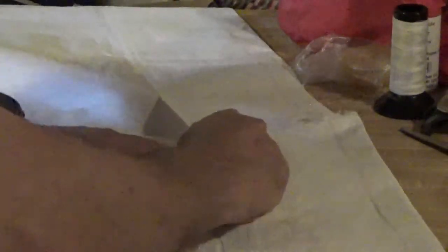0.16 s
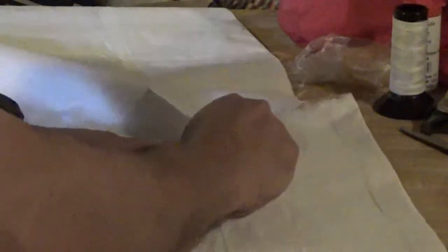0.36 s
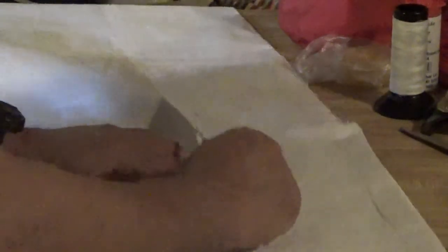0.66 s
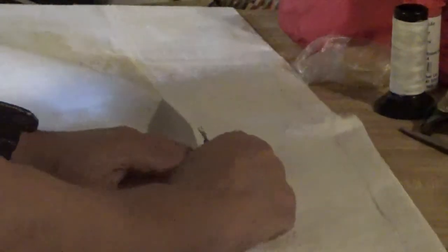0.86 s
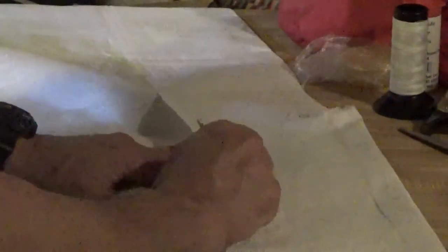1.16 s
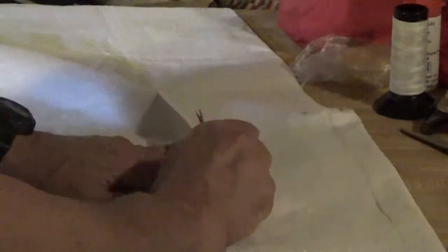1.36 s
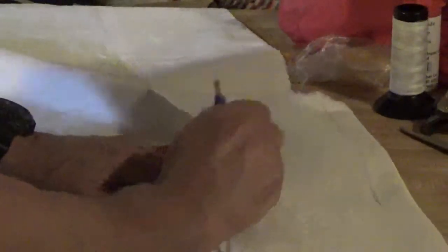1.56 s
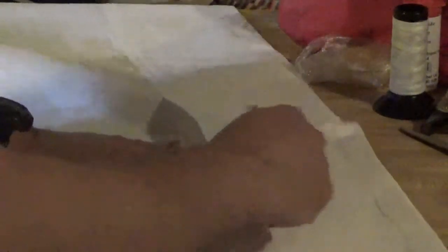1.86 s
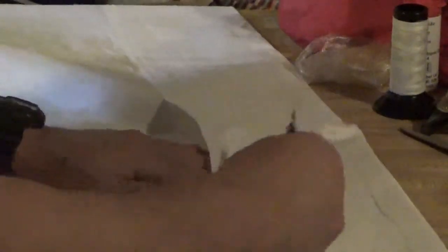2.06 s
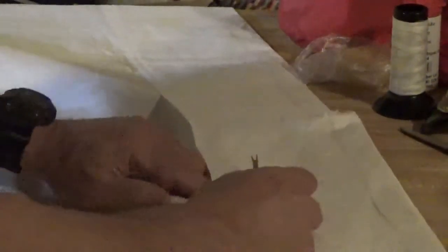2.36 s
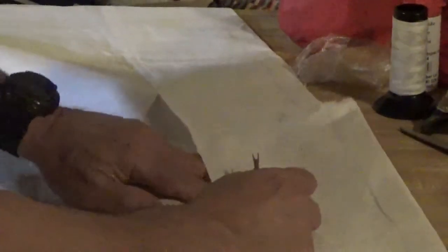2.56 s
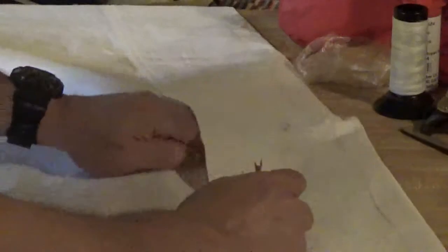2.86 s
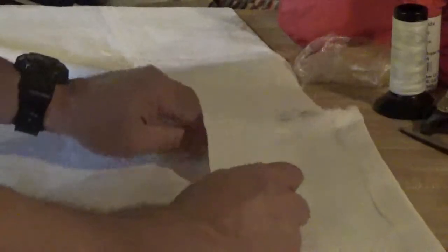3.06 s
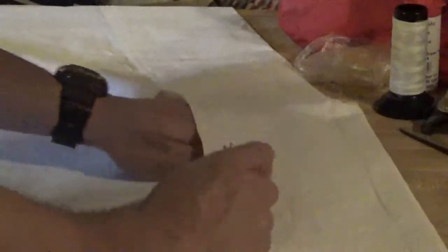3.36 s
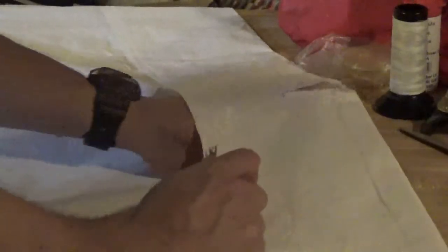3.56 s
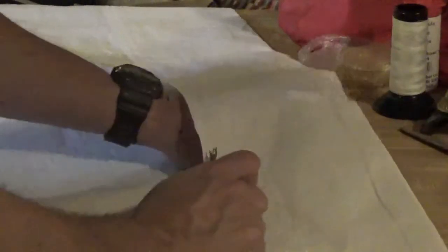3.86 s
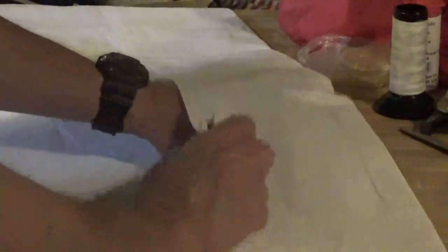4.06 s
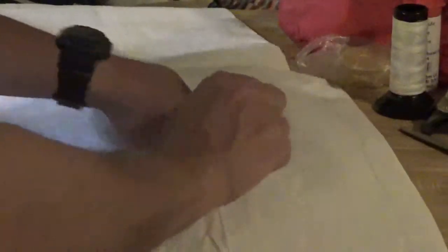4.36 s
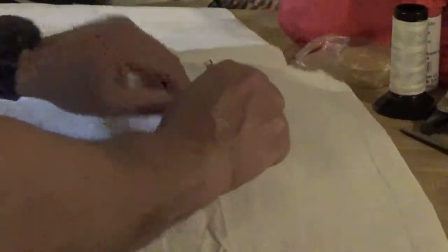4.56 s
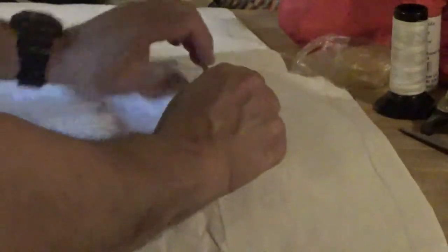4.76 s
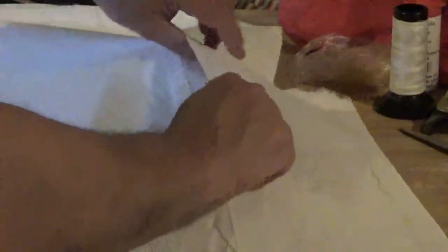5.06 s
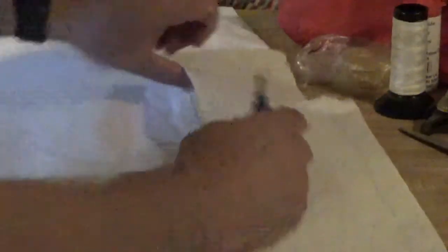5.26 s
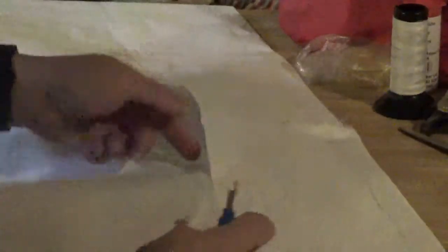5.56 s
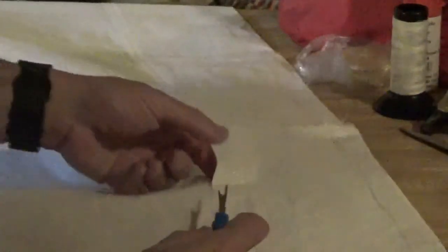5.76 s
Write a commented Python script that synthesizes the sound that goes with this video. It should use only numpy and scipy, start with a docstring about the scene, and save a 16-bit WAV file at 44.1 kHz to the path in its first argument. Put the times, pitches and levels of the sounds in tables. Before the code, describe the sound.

Close, dry rustling of heavy sailcloth being handled, broken by a sharp ripping snap, a soft hand touch and scattered crisp pops.

```python
"""Picking apart a sailcloth seam

Stiff sailcloth is worked with a seam ripper on a wooden table, close to a camera microphone in a small room.
Random grains, coloured by band, make the weave hiss, the panels crumple and the creases crackle.
Short damped swings make the pops of creases flipping over and the loud, short rip of stitches parting.
The rip and a hand coming down softly after it excite decaying cosines, the modes of the table."""
import sys
import numpy as np
from scipy import signal
from scipy.fft import rfft, irfft
from scipy.io import wavfile
from scipy.ndimage import map_coordinates

SR = 44100
rng = np.random.default_rng(int(sys.argv[2]) if len(sys.argv) > 2 else 0)


def store_pcm(level_fs):
    """Save levels as 16-bit WAV."""
    pcm = np.round(np.clip(level_fs, -1, 1) * 32767).astype(np.int16)
    wavfile.write(sys.argv[1], SR, np.atleast_2d(pcm).T)


N = 261072
TIME = np.arange(N) / SR
PRE_S = 1 / 1000  # a crack's waveform begins this long before its centre


def undb(db):
    """Decibels to amplitude ratio."""
    return 10 ** (np.asarray(db) / 20)


def unit(x):
    """Scale to an RMS of 1."""
    return x / np.sqrt(np.mean(x ** 2))


def add(track, s, sound):
    """Mix a sound in from time s, or from the start if s is negative."""
    i = max(int(s * SR), 0)
    track[i:i + len(sound)] += sound[:len(track) - i]


def colour(x, points, size=2048):
    """Minimum-phase filter that follows a (Hz, dB) spectrum, built by folding its cepstrum."""
    hz, db = np.transpose(points)
    log_hz = np.log(np.fft.rfftfreq(size, 1 / SR) + 1)
    log_gain = np.log(undb(np.interp(log_hz, np.log(hz), db)))
    cepstrum = irfft(log_gain)[:size // 2]
    cepstrum[1:] *= 2
    response = irfft(np.exp(rfft(cepstrum, size)))
    return signal.fftconvolve(x, response)[:len(x)]


def band(x, hz, q):
    """One resonance; a low q makes it broad."""
    return signal.lfilter(*signal.iirpeak(min(hz, SR / 4), max(q, .5), fs=SR), x)


def fade(t, t60):
    """Exponential decay that falls 60 dB in t60 seconds."""
    return np.exp(-np.log(1000) * t / t60)


def walk(rate):
    """Random wander: straight lines between normal draws, rate draws per second."""
    steps = rng.standard_normal(N // 20)
    return np.interp(TIME * rate, np.arange(len(steps)), steps)


def grains(rate, spread_db):
    """Tiny slips at random moments, rate per second; a wider spread makes a few much larger."""
    sizes = undb(spread_db * np.minimum(rng.exponential(size=N), 4))
    happens = rng.random(N) < rate / SR
    return unit(happens * rng.choice([-1, 1], N) * sizes)


def room_tone():
    """Steady air of the small room: noise coloured to a fixed spectrum."""
    # spectrum of the air: f/Hz, relative level/dB
    tone_spectrum = [(25, -29), (60, -13.5), (120, -11), (280, 2), (500, -2), (1500, -11), (4000, -8.5),
                     (11000, -17.5)]
    return undb(-68.5) * unit(colour(rng.standard_normal(N), tone_spectrum))


def room(x, t60, treble_t60):
    """Dense reflections from the table and near walls; the treble dies first."""
    t = TIME[:SR // 2]
    noise = rng.standard_normal(len(t))
    low = signal.sosfilt(signal.butter(1, 2500, fs=SR, output="sos"), noise)
    tail = low * fade(t, t60) + (noise - low) * fade(t, treble_t60)
    tail = tail * np.minimum(t / 0.0024, 1)  # the reflections build up over 2.4 ms
    return signal.fftconvolve(x, tail / np.sqrt(np.sum(tail ** 2)))[:N]


def table(push):
    """The table top under the taut cloth rings in its modes."""
    # modes of the wood: f/Hz, level/dB, t60/s
    table_modes = [(99, -24.5, 0.34), (142, -15, 0.18), (232.4, -14, 0.23), (302, -14.5, 0.097),
                   (426, -13.5, 0.097), (515, -18, 0.16), (561, -8, 0.057), (696, -31, 0.19),
                   (900, -4, 0.053), (1087, 2.5, 0.052), (1181, -3, 0.077), (1289, -48, .08),
                   (1697, -9, .09), (1930, -30, 0.046), (2920, -21, 0.095)]
    t = TIME[:SR // 2]
    ring = sum(undb(db) * fade(t, t60) * np.cos(2 * np.pi * hz * t) for hz, db, t60 in table_modes)
    return signal.fftconvolve(push, ring)[:N]


def hand(low_hz, soft_hz, gain_db):
    """Soft flesh, set down lightly, wakes mainly the table's low-middle modes."""
    # touches as the hand settles: t/s, relative level/dB
    presses = [(2.2141, -32.5), (2.2219, -38), (2.2245, -33.5)]
    push = np.zeros(N)
    for s, db in presses:
        add(push, s, undb([db + gain_db]))
    soft_band = signal.butter(2, [low_hz, soft_hz], "bandpass", fs=SR, output="sos")
    return table(signal.sosfilt(soft_band, push))


def handling():
    """Levels in dB of bending, creasing and sliding: each stroke starts, swells or eases, and dies away."""
    # pushes and pulls of the cloth: start t/s, length/s, effort level/dB, swell over the stroke/dB,
    # hiss against effort/dB, bending against effort/dB
    strokes = [(-0.02, 0.16, -60.5, -11, -2.5, -22), (0.174, 0.061, -52, -0.5, -3.5, -21),
               (0.248, 0.043, -46, 3, 1, -5), (0.587, 0.046, -48, 2.5, -3, -8.5),
               (0.65, 0.053, -52.5, -4, -2.5, -0.5), (0.782, 0.29, -60, -12, -4.5, -20),
               (1.092, 0.13, -60.5, 3, -4, -3.5), (1.371, 0.02, -51, -1.5, -5, -6),
               (1.513, 0.17, -59, 0.5, -0.5, 1), (1.701, 0.15, -51.5, 0.5, -2.5, -6),
               (1.87, 0.026, -55.5, 1.5, -0.5, -3), (2.02, 0.14, -62, 6.5, -4.5, -8),
               (2.176, 0.033, -49.5, 2, -5.5, 0.5), (2.232, 0.065, -53, -1, -5.5, -12),
               (2.526, 0.2, -57.5, 6.5, -1.5, -6.5), (2.713, 0.032, -47.5, 0, -2.5, -12),
               (2.778, 0.11, -51, 5.5, 1.5, -15.5), (2.965, 0.14, -56, 1, -1, -6.5),
               (3.084, 0.092, -53, 6, 2.5, -7), (3.249, 0.53, -50, 3.5, 1, -10),
               (3.876, 0.063, -52.5, 10, -3, -7), (3.955, 0.39, -53.5, 2.5, -3, -6.5),
               (4.26, 0.34, -50.5, 3.5, 0.5, -3), (4.756, 0.039, -51.5, 7, 0.5, -4),
               (4.809, 0.11, -52, -1.5, -3, 0.5), (4.93, 0.12, -54.5, 4, 0.5, 1.5),
               (5.109, 0.13, -53, -5, 0.5, 0.5), (5.249, 0.3, -57.5, -6, 0, -5.5),
               (5.621, 0.16, -58.5, 2.5, 0, -0.5), (5.855, 0.053, -56.5, -4, -2.5, -3)]
    # cloth merely held: bending level/dB, creasing level/dB, sliding level/dB
    resting_db = (-68.5, -65.5, -67)
    attack_s, attack_share = 0.024, 0.088  # plus a share of the length: long pulls start gently
    release_db_per_s = 202  # every stroke comes to rest alike
    power = np.outer(undb(resting_db) ** 2, np.ones(N))
    for s, length, effort_db, swell_db, hiss_db, bend_db in strokes:
        t = TIME[:int(length * SR) + SR // 2]
        swell = swell_db * (np.minimum(t / length, 1) - .5)
        release = release_db_per_s * np.maximum(t - length, 0)
        attack = np.minimum(t / (attack_s + attack_share * length), 1)
        stroke = attack * undb(effort_db + swell - release)
        for layer, share_db in zip(power, (bend_db, 0, hiss_db)):
            add(layer, s, (stroke * undb(share_db)) ** 2)
    return 10 * np.log10(power)


def rub(x, drift_db, rate):
    """The patch in contact keeps changing, so the colour of the rubbing shifts band by band."""
    out = 0
    for hz in np.geomspace(600, 10000, 8):
        out = out + band(x, hz, q=6.9) * (undb(drift_db * walk(rate)) - 1)
    return x + out


def cloth(bend_db, crease_db, slide_db):
    """Broad panels crumple low, creases crackle higher, and the weave hisses over hand and table."""
    # crumpling panels: f/Hz, relative level/dB
    bend_spectrum = [(30, -31), (70, -28), (130, -17), (220, -15), (300, -1), (500, 1.5), (590, 3),
                     (790, 2), (885, -0.5), (1010, -3.5), (1200, -3.5), (1500, 1), (2200, -23.5),
                     (5000, -18)]
    # crackling creases: f/Hz, relative level/dB
    crease_spectrum = [(400, -28.5), (1100, -0.5), (1600, -2.5), (2000, 3), (2700, 1), (3600, -0.5),
                       (5000, -7), (9000, -29)]
    # hissing weave: f/Hz, relative level/dB
    slide_spectrum = [(800, -51), (2500, -5), (4500, 1), (5400, 1.5), (6400, 3), (7500, 0), (10000, 1.5),
                      (11000, -3.5)]
    grip_db = walk(70)  # the cloth catches and lets go
    bend = unit(colour(grains(rate=1100, spread_db=2.0), bend_spectrum)) * undb(bend_db)
    crease = unit(colour(grains(rate=3000, spread_db=1.0), crease_spectrum)) * undb(crease_db - 1.0)
    slide = unit(colour(grains(rate=4300, spread_db=1.5), slide_spectrum)) * undb(slide_db + 1.0)
    return rub((bend + crease + slide) * undb(grip_db), drift_db=2.2, rate=35)


def bounce(x, sway, echo_db):
    """Raised folds throw back faint early echoes; their paths shift as the sheet moves, rippling its colour."""
    # extra travel time of each fold's echo: t/s, around which it sways
    fold_lags = [0.00115, .0029, .0047]
    out = x
    for k, lag_s in enumerate(fold_lags):
        delay = lag_s * (1 + sway * walk(4))
        echo = map_coordinates(x, [(TIME - delay) * SR], order=3)
        out = out + (-1) ** k * undb(echo_db) * echo
    return out / np.sqrt(1 + len(fold_lags) * undb(echo_db) ** 2)


def crack(hz, cycles, edge):
    """A patch of cloth flips: a steep swing that dies within a few cycles; cycles and edge set fall and rise."""
    t = TIME[:SR // 20] - PRE_S
    rise = np.exp(np.minimum(t, 0) * hz / edge)
    fall = np.exp(-np.abs(t) * hz / cycles)
    swing = np.where(t < 0, rise, fall)
    # a small patch radiates its speed, so there is hardly any bass
    speed = np.gradient(swing * np.sin(2 * np.pi * hz * t))
    return speed / np.max(speed)


def small_pops(bend_db):
    """Lesser creases flip at random moments, the louder the harder the cloth is bent."""
    pops_per_s, centre_hz, spread_octaves = 9.9, 1060, 0.38
    # crack and shiver against the bending level, ahead of the trims in pops(); random scatter either way
    small_crack_db, small_shiver_db, scatter_db = 13, 1.5, 5.5
    chance = rng.random((int(pops_per_s * N / SR), 3))
    rows = []
    for when, size, pitch in chance:
        i = int(when * N)
        db = bend_db[i] + scatter_db * (2 * size - 1)
        hz = centre_hz * 2 ** (spread_octaves * (2 * pitch - 1))
        rows.append((TIME[i], db + small_crack_db, hz, db + small_shiver_db))
    return rows


def pops(bend_db, crack_db, flutter_db, flutter_t60):
    """Each crease or ticking thread cracks, and the sheet around it shivers for a moment."""
    # creases flipping and threads ticking: t/s, relative peak level/dB, f/Hz, relative shiver level/dB
    big_pops = [(0.1786, -36.5, 600, -51), (0.2039, -32, 1710, -51), (0.2079, -28, 1540, -52),
                (0.3229, -28, 1100, -43.5), (0.3353, -31, 2880, -34), (0.3432, -24.5, 1290, -44),
                (0.3886, -43, 1220, -48), (0.5904, -41, 2080, -46.5), (0.7067, -35, 627, -58),
                (1.174, -39, 840, -52), (1.2586, -24.5, 2050, -45), (1.3535, -45, 5300, -49.5),
                (1.3964, -24.5, 1060, -42), (1.4108, -26, 2140, -45), (1.8139, -31, 4340, -39),
                (1.8927, -43, 1410, -47.5), (2.0274, -41, 2570, -52), (2.3413, -33.5, 780, -51),
                (2.4224, -47, 1337, -48.5), (3.0843, -31, 1540, -48), (3.1373, -32, 1300, -58),
                (3.1665, -33.5, 1290, -53), (3.321, -36, 1010, -44.5), (3.632, -35, 800, -47),
                (3.7719, -29, 1960, -46.5), (4.1722, -37, 796, -48), (4.2997, -14.5, 2210, -32.5),
                (4.3278, -20.5, 1240, -36.5), (4.357, -30, 1190, -45), (4.367, -27, 1180, -49),
                (4.4462, -35, 1160, -39), (4.895, -37, 1780, -45), (4.9141, -30, 1500, -45),
                (5.8223, -28, 1640, -46)]
    # shivering sheet: f/Hz, relative level/dB
    flutter_spectrum = [(60, -34), (250, -9.5), (600, 16), (1200, 10), (3000, 6), (6000, -2.5), (11000, 2)]
    out, t = np.zeros(N), TIME[:SR // 6]
    decay = fade(t, flutter_t60) + undb(-7.0) * fade(t, 0.14)
    for s, db, hz, shiver_db in big_pops + small_pops(bend_db):
        shiver = unit(colour(band(rng.standard_normal(len(t)), hz, q=0.8), flutter_spectrum))
        add(out, s - PRE_S, undb(db + crack_db) * crack(hz, cycles=0.52, edge=0.81))
        add(out, s, undb(shiver_db + flutter_db) * shiver * decay)
    return out


def rip(tear_t60, tug_hz):
    """Stitches part in quick succession; each cracks, drags thread through the holes and tugs at the table."""
    # stitches giving way: t/s, crack peak level/dB, f/Hz, relative level of tearing fibres/dB,
    # relative level of the tug on the table/dB
    stitches = [(1.5556, -38, 1000, -47, -56), (1.56, -28, 2400, -31.5, -57),
                (1.5616, -11, 1630, -27.5, -26), (1.5647, -17, 4160, -34, -56),
                (1.5726, -11, 2090, -30.5, -39), (1.58, -24, 2430, -31.5, -47),
                (1.594, -15, 5170, -30, -24), (1.622, -44, 1900, -45, -47)]
    # tearing fibres: f/Hz, relative level/dB
    tear_spectrum = [(60, -30), (100, -8), (260, -18.5), (340, -32), (440, -9), (700, -2), (1000, 1),
                     (1900, -1), (2800, -1.5), (3500, -8.5), (4000, -4.5), (5500, -7), (8000, -8.5),
                     (11000, -12.5)]
    cracks, tear_power, tugs = np.zeros((3, N))
    for s, crack_db, hz, tear_db, tug_db in stitches:
        add(cracks, s - PRE_S, undb(crack_db) * crack(hz, cycles=0.64, edge=0.34))
        add(tear_power, s, (undb(tear_db + 0.5) * fade(TIME[:SR // 2], tear_t60)) ** 2)
        add(tugs, s, undb([tug_db - 0.5]))
    fibres = unit(colour(grains(rate=6000, spread_db=0.0), tear_spectrum))
    # the cloth cushions each tug before it reaches the wood
    knock = table(band(tugs, tug_hz, q=0.61))
    return cracks + np.sqrt(tear_power) * fibres + knock


def scene():
    """The work is straight ahead of the microphone; reflections and room tone spread to the sides."""
    # side against middle for the sheet's reflections: f/Hz, level/dB
    sheet_width = [(60, -8), (300, -18), (1100, -12), (11000, -11.5)]
    # side against middle for the knocks' reflections: f/Hz, level/dB
    knock_width = [(100, -13), (350, -26), (1000, -19), (2000, -16.5), (4000, -10.5)]
    bend_db, crease_db, slide_db = handling()
    sheet = bounce(cloth(bend_db, crease_db, slide_db), sway=0.132, echo_db=-18)
    ticks = pops(bend_db, crack_db=-3.0, flutter_db=0.5, flutter_t60=0.021)
    # sheet and ticks leak a little into the table
    leak = undb(-49.5)
    sheet = sheet + leak * table(sheet)
    ticks = ticks + leak * table(ticks)
    knocks = ticks + rip(tear_t60=0.14, tug_hz=1200) + hand(low_hz=257, soft_hz=496, gain_db=8.5)
    near = sheet + knocks
    mid = near + undb(-16) * room(near, t60=0.24, treble_t60=0.17) + room_tone()
    wide = colour(sheet, sheet_width) + colour(knocks, knock_width)
    side = room(wide, t60=0.2, treble_t60=0.1) + undb(-7.5) * room_tone()
    left = undb(-0.13) * (mid + side)
    right = mid - side
    return np.array([left, right])


def record(dry):
    """The camera microphone thins out the deepest bass and keeps next to nothing above its cut-off."""
    top_hz = 11050
    thin = signal.sosfilt(signal.butter(2, 55, "highpass", fs=SR, output="sos"), dry)
    return signal.sosfilt(signal.ellip(12, .1, 80, top_hz, fs=SR, output="sos"), thin)


dry = scene()
out = record(dry)
store_pcm(out)
```